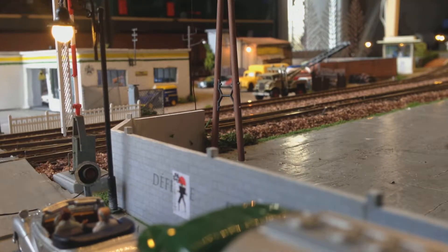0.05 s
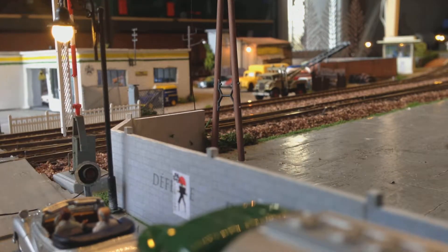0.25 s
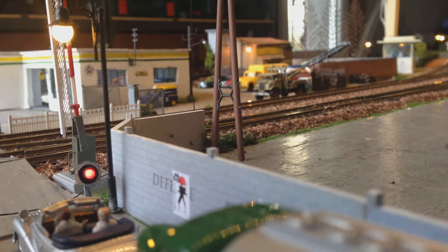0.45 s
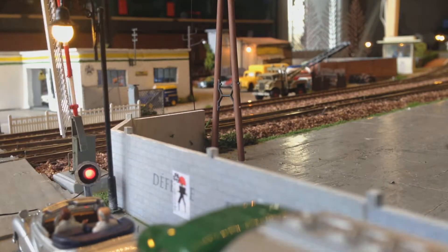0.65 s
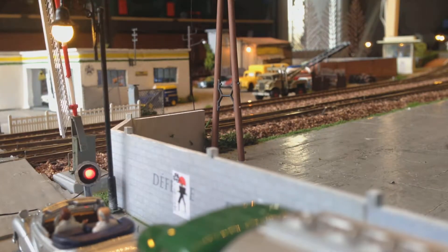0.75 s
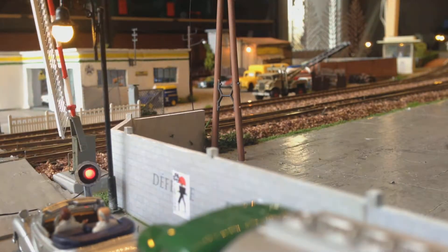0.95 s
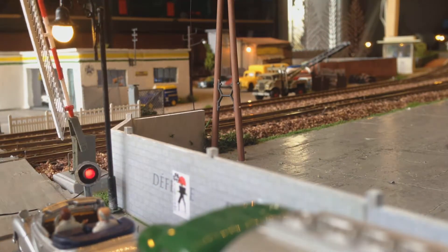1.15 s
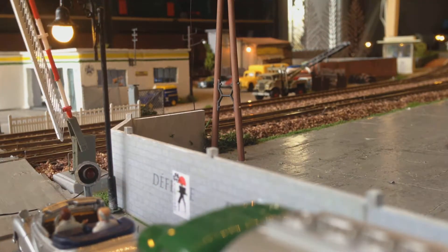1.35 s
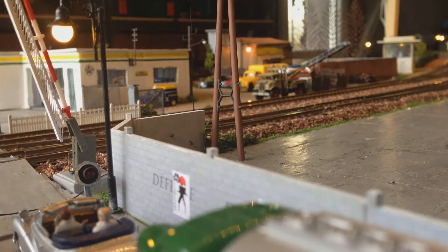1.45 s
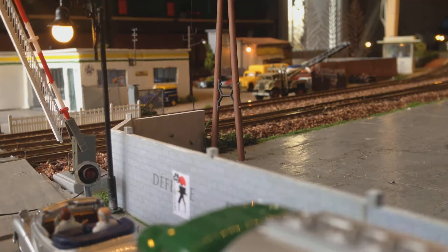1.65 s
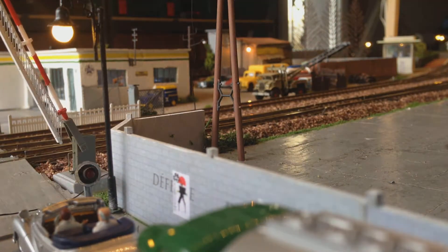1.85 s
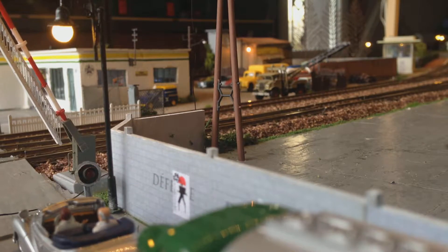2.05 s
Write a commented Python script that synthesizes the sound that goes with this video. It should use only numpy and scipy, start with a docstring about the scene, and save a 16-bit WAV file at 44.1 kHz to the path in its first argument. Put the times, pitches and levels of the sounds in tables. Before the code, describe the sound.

A small hand-worked mechanism lowers a model railway barrier: two short scrapes with light knocks, then a grainy, hissing whirr with tiny squeaks that comes to rest. A faint steady hum and room noise lie beneath.

```python
"""At a model railway crossing, a small hand-worked mechanism lowers the barrier.
Two short scrapes take up the slack, then the linkage slides on with a grainy whirr, squeaks briefly
and comes to rest. The principle is stick-slip friction: tiny slips excite the low and high resonant
modes of the mechanism, and play in the linkage adds knocks and ticks on the same modes.
A steady hum and faint room noise lie beneath."""
import sys
import numpy as np
from scipy import signal
from scipy.fft import rfft, irfft, next_fast_len
from scipy.io import wavfile
from scipy.ndimage import map_coordinates

SR = 44100
rng = np.random.default_rng(int(sys.argv[2]) if len(sys.argv) > 2 else 0)


def persist_wave(psi):
    """Save psi, clipped to +-1, as 16-bit WAV."""
    counts = np.round(np.clip(psi, -1, 1) * 32767).astype(np.int16)
    wavfile.write(sys.argv[1], SR, np.atleast_2d(counts).T)


N = 92610  # 2.1 s

# envelopes of the whirr and of its hiss: time_s, relative_level_db
WHIRR_ENVELOPE = [(0, -47), (.06, -54), (.19, -56), (.228, -41), (.285, -38), (.32, -42), (.38, -41.5),
                  (.44, -53), (.51, -53), (.56, -39.5), (.64, -41), (.78, -36), (1.12, -35), (1.3, -37),
                  (1.44, -40), (1.62, -37.5), (1.72, -38.5), (1.82, -42), (1.88, -53), (1.92, -48),
                  (1.96, -56), (2.1, -53)]
HISS_ENVELOPE = [(0.0, -57.5), (0.16, -59.5), (0.27, -50), (0.37, -52), (0.44, -59.5), (0.53, -56.5),
                 (0.57, -48.5), (0.69, -46.5), (0.78, -40), (0.84, -42), (1.06, -40), (1.32, -44),
                 (1.37, -43.5), (1.44, -49), (1.58, -44), (1.79, -48.5), (1.92, -60.5), (2.1, -60.5)]
# excitation spectra of the sliding contact: frequency_hz, density_db
WHIRR_SPECTRUM = [(900, -44), (1500, -21), (2100, -12.5), (2350, -7), (2700, -5.5), (2960, -1.5),
                  (3080, -1.5), (3230, -3.5), (3450, -4.5), (3800, -16), (5000, -45), (9000, -62)]
HISS_SPECTRUM = [(2800, -57), (3800, -1), (4700, 1), (5200, -2), (5800, -5), (6300, -12), (6900, -9),
                 (8000, -20), (8900, -17.5), (10400, -23), (12000, -31), (13000, -41), (15500, -53)]
# high and treble modes of the mechanism: frequency_hz, gain_db
HIGH_MODES = [(1655, 3), (1812, 1), (1938, 3), (2261, 1), (2335, -1), (2455, 0), (2524, -2), (2700, -1),
              (2803, 2), (2886, 2), (2966, 2), (3165, -1), (3219, 3), (3413, 3), (3662, 4)]
TREBLE_MODES = [(3978, -2), (4155, 1), (4484, 0), (4760, 3), (5000, -2), (5502, -3), (5771, -3), (6013, -3),
                (6681, -2), (6900, -2), (8600, 1), (8950, 1), (10300, 0)]
def whirr():
    """Sliding friction: fine slips of the linkage excite the high modes and hiss above them."""
    force = slips(per_s=5000, spread_db=0.5, judder_db=1.5, judder_per_s=170)
    fine_force = slips(per_s=9000, spread_db=2.5, judder_db=1.12, judder_per_s=170)
    slide = friction(force, envelope(WHIRR_ENVELOPE), HIGH_MODES, WHIRR_SPECTRUM,
                     width_hz=22, ring_db=-0.5, echo_db=-7)
    hiss = friction(fine_force, envelope(HISS_ENVELOPE), TREBLE_MODES, HISS_SPECTRUM,
                    width_hz=40, ring_db=-11, echo_db=1.5)
    return amp(1.07) * slide + amp(2.14) * hiss


# envelope of the scrapes: time_s, relative_level_db
SCRAPE_ENVELOPE = [(0, -49), (.06, -55), (.14, -58), (.18, -52), (.205, -50), (.216, -39), (.28, -36.5),
                   (.33, -43), (.385, -42), (.42, -51), (.49, -56), (.527, -48), (.548, -34), (.63, -38),
                   (.7, -46), (.77, -48.5), (1.34, -46), (1.42, -48.5), (1.47, -45), (1.53, -50),
                   (1.7, -49), (1.8, -53.5), (1.87, -56), (2.1, -60)]
# excitation spectrum of the scraping contact: frequency_hz, density_db
SCRAPE_SPECTRUM = [(450, -55), (700, -21.5), (880, -18.5), (950, -15.5), (1020, -1), (1230, -2.5),
                   (1350, -1.5), (1450, -11), (2000, -13.5), (3000, -20), (6000, -65)]
# low modes of the mechanism: frequency_hz, gain_db
LOW_MODES = [(779, 3), (877, 2), (920, -3), (1008, 3), (1040, -6), (1098, 1), (1147, -4), (1188, 0),
             (1224, -1), (1262, -3), (1347, -1), (1410, -7), (1508, 4), (1655, 2)]
def scrape():
    """Stick-slip excitation: coarse slips ring the low modes."""
    force = slips(per_s=2500, spread_db=0.5, judder_db=1, judder_per_s=130)
    return amp(1) * friction(force, envelope(SCRAPE_ENVELOPE), LOW_MODES, SCRAPE_SPECTRUM,
                             width_hz=15.5, ring_db=-1.5, echo_db=-4.5)


# excitation spectrum of the loaded contact: frequency_hz, density_db
GRIND_SPECTRUM = [(350, -56), (550, -21.5), (690, -16), (780, -3.5), (850, -12.5), (990, 4.5), (1120, -3),
                  (1400, -18), (1520, -7.5), (1700, -30), (2300, -10.5), (3500, -42), (7000, -70)]
def grind(start_s=0.535, attack_s=0.06, hold_s=0.04, release_db_per_s=150):
    """Friction under load: the contact grinds lower as the linkage starts to move, then dies away."""
    t = clock() - start_s
    attack = np.clip(t / attack_s, 0, 1)
    release = amp(-release_db_per_s * np.maximum(t - attack_s - hold_s, 0))
    force = slips(per_s=1800, spread_db=1, judder_db=0.5, judder_per_s=91)
    return friction(force, amp(-30) * attack * release, LOW_MODES, GRIND_SPECTRUM,
                    width_hz=28, ring_db=0, echo_db=-8.5)


# envelope of the rasp: time_s, level_db
RASP_ENVELOPE = [(.19, -75), (.2, -50), (.25, -46), (.3, -42), (.355, -42.5), (.39, -50), (.43, -60),
                 (.52, -66), (.555, -42), (.59, -40.5), (.66, -51), (.72, -75)]
# excitation spectrum of the rasping contact: frequency_hz, density_db
RASP_SPECTRUM = [(1200, -19), (1650, -5.5), (2000, -4), (2300, -3), (2750, -0.5), (2950, -15), (3600, -19),
                 (4550, -3.5), (5500, -41), (8000, -36)]
def rasp():
    """Intermittent friction: dry, bunched slips excite the high modes while the slack is taken up."""
    force = slips(per_s=1400, spread_db=2, judder_db=4, judder_per_s=110)
    return friction(force, envelope(RASP_ENVELOPE), HIGH_MODES, RASP_SPECTRUM,
                    width_hz=13, ring_db=-1, echo_db=-13)


# catches of the slide: end_s, length_s, pitch_hz, relative_level_db
SQUEAKS = [(.272, .012, 3100, -35), (.292, .013, 2870, -31), (.34, .01, 2990, -33), (.353, .011, 2480, -34),
           (.589, .011, 2320, -32), (.73, .014, 2970, -31), (.79, .014, 3220, -33),
           (.834, .012, 2840, -34.5), (.848, .012, 2350, -35), (.857, .011, 2960, -32),
           (.928, .014, 2950, -31), (.98, .014, 2940, -29), (1.039, .014, 3180, -31),
           (1.116, .012, 3000, -28), (1.118, .013, 3430, -31), (1.159, .011, 2970, -31),
           (1.179, .012, 2995, -31), (1.218, .013, 2895, -28.5), (1.259, .01, 2940, -33),
           (1.309, .028, 2965, -25.5), (1.506, .01, 3025, -35)]
def squeaks(swell_db=9, pitch_jitter=0.022, attack_s=0.0014, release_s=0.0019):
    """Self-excited vibration: slips lock briefly onto one resonance, swell unsteadily and break off."""
    t, out = clock(), np.zeros(N)
    jittered_time = np.cumsum(1 + pitch_jitter * wobble(500)) / SR
    for end_s, length_s, pitch_hz, level_db in SQUEAKS:
        swell = amp(level_db + swell_db * np.clip((t - end_s) / length_s, -1, 0))
        gate = np.clip((t - end_s + length_s) / attack_s, 0, 1) * np.clip((end_s - t) / release_s, 0, 1)
        out += swell * gate * np.sin(2 * np.pi * (pitch_hz * jittered_time + rng.random()))
    flutter = amp(wobble(400))
    return amp(1) * out * flutter


# impacts in the linkage: start_s, peak_db
KNOCKS = [(.1965, -28), (.215, -30), (.237, -31), (.251, -32), (.54, -31), (.555, -27), (.579, -23),
          (.602, -26), (.612, -28), (.626, -24), (1.449, -32.5), (1.663, -35)]
TICKS = [(.6035, -26), (.782, -28), (1.033, -28), (1.271, -29), (1.514, -26), (1.908, -35)]
# excitation spectrum of a knock: frequency_hz, gain_db
KNOCK_SPECTRUM = [(780, -26), (900, -15), (1010, 0), (1130, 0), (1230, -4), (1350, -9), (1500, -22)]
def knocks_and_ticks():
    """Impact excitation: play in the linkage knocks on the low modes and ticks on the higher ones."""
    out = np.zeros(N)
    for start_s, peak_db in KNOCKS:
        add(out, start_s, peak_db, struck(LOW_MODES, KNOCK_SPECTRUM, t60_s=0.058))
    for start_s, peak_db in TICKS:
        add(out, start_s, peak_db, struck(HIGH_MODES + TREBLE_MODES, WHIRR_SPECTRUM, t60_s=0.005))
    return out


# envelope of a faint tone above the hum: time_s, level_db
TONE_ENVELOPE = [(.1, -75), (.4, -73), (.85, -68.5), (1.1, -83.5)]
# spectrum of the room noise: frequency_hz, density_db
ROOM_SPECTRUM = [(20, -32), (40, -6), (60, -4), (95, 0.5), (130, -6), (190, -4.5), (300, -9), (450, -13.5),
                 (700, -14), (2000, -11), (6000, -15), (12000, -27.5), (15500, -26.5)]
def room(hum_fade_db_per_s=1.6, bump_s=1.885, bump_width_s=0.018, bump_hz=72):
    """Superposition: a slowly weakening hum, two faint higher tones, one soft bump and room noise."""
    t = clock()
    hum = amp(-57.5 - hum_fade_db_per_s * (t - t.mean())) * sine(pitch_hz=244.15)
    tone = envelope(TONE_ENVELOPE) * sine(pitch_hz=469.5)
    whine = amp(-69) * sine(pitch_hz=877)
    bump_gain = amp(-59) * np.exp(-((t - bump_s) / bump_width_s) ** 2)
    bump = bump_gain * np.sin(2 * np.pi * bump_hz * (t - bump_s))
    noise = amp(-59) * unit(coloured(rng.standard_normal(N), ROOM_SPECTRUM))
    return hum + tone + whine + bump + noise


def slips(per_s, spread_db, judder_db, judder_per_s):
    """Shot noise: tiny random slips of a rubbing contact, bunched by its judder."""
    impulses = (rng.random(N) < per_s / SR) * rng.choice([-1, 1], N)
    sizes = amp(spread_db * rng.standard_normal(N))
    return unit(impulses * sizes * amp(judder_db * wobble(judder_per_s)))


def friction(force, gain, modes, spectrum, width_hz, ring_db, echo_db):
    """Source and filter: slips are heard as broadband noise and through the modes, following gain."""
    contact = unit(coloured(force, spectrum))
    ring, steady_ring = resonate(np.array([contact * gain, contact]), modes, width_hz)
    broadband = echoed(contact * gain, echo_db)
    return (broadband + amp(ring_db) * ring / steady_ring.std()) / (1 + amp(ring_db))


def resonate(x, modes, width_hz, wander_db=2.5, wander_per_s=24):
    """Forced resonance: x drives narrow modes, each waxing and waning as the contact moves along."""
    radius, out = np.exp(-np.pi * width_hz / SR), 0
    for hz, gain_db in modes:
        pole_real = radius * np.cos(2 * np.pi * hz / SR)
        ring = signal.lfilter([1, -pole_real], [1, -2 * pole_real, radius ** 2], x)
        out = out + amp(gain_db + wander_db * wobble(wander_per_s)) * ring
    return out


def struck(modes, spectrum, t60_s, attack_s=0.0017):
    """Damped free vibration: a blow starts the modes, weighted by the spectrum of the contact."""
    t, ring = np.arange(SR // 10) / SR, 0
    for hz, gain_db in modes:
        contact_db = np.interp(hz, *np.transpose(spectrum))
        ring = ring + amp(gain_db + contact_db) * np.sin(2 * np.pi * (hz * t + rng.random()))
    attack = 1 - np.exp(-(t / attack_s) ** 2)
    return ring * attack * amp(-60 * t / t60_s)


def echoed(x, echo_db, t60_s=0.073):
    """Reverberation: x with dense, quickly fading reflections from the layout."""
    t = np.arange(SR // 8) / SR
    tail = rng.standard_normal(len(t)) * amp(-60 * t / t60_s)
    reflections = signal.fftconvolve(x, tail / np.linalg.norm(tail))[:N]
    return (x + amp(echo_db) * reflections) / np.sqrt(1 + amp(echo_db) ** 2)


def amp(db):
    """Decibels to gain."""
    return 10 ** (np.asarray(db) / 20)


def unit(x):
    """Normalisation to rms 1."""
    return x / np.sqrt(np.mean(x ** 2) + 1e-20)


def clock():
    """The time of every sample in seconds."""
    return np.arange(N) / SR


def sine(pitch_hz):
    """A pure tone of rms 1."""
    return np.sqrt(2) * np.sin(2 * np.pi * pitch_hz * clock())


def envelope(rows):
    """Gain interpolated in decibels between (time_s, level_db) rows."""
    return amp(np.interp(clock(), *np.transpose(rows)))


def wobble(knots_per_s):
    """Smooth random modulation."""
    knots = rng.standard_normal(int(N * knots_per_s / SR) + 4)
    return map_coordinates(knots, [clock() * knots_per_s])


def filtered(x, response):
    """Linear filtering: the spectrum of x times a frequency response."""
    n = x.shape[-1]
    padded = next_fast_len(n + SR // 8)
    return irfft(rfft(x, padded) * response(np.fft.rfftfreq(padded, 1 / SR)), padded)[..., :n]


def coloured(x, spectrum):
    """Spectral shaping by (frequency_hz, density_db) rows, joined on a logarithmic frequency axis."""
    hz, db = np.transpose(spectrum)
    return filtered(x, lambda f: amp(np.interp(np.log(f + 1), np.log(hz), db)))


def add(out, start_s, peak_db, sound):
    """Mix a sound into out at start_s with a peak of peak_db."""
    part = out[round(start_s * SR):][:len(sound)]
    part += amp(peak_db) * sound[:len(part)] / np.abs(sound).max()


def scene():
    """Superposition: all sources sum to one signal, alike in both channels."""
    mechanism = scrape() + rasp() + whirr() + grind() + knocks_and_ticks() + squeaks()
    return np.tile(mechanism + room(), (2, 1))


def record(dry, cutoff_hz=15400):
    """Band limiting: nothing above the cutoff passes."""
    return filtered(dry, lambda hz: hz < cutoff_hz)


dry = scene()
out = record(dry)
persist_wave(out)
```